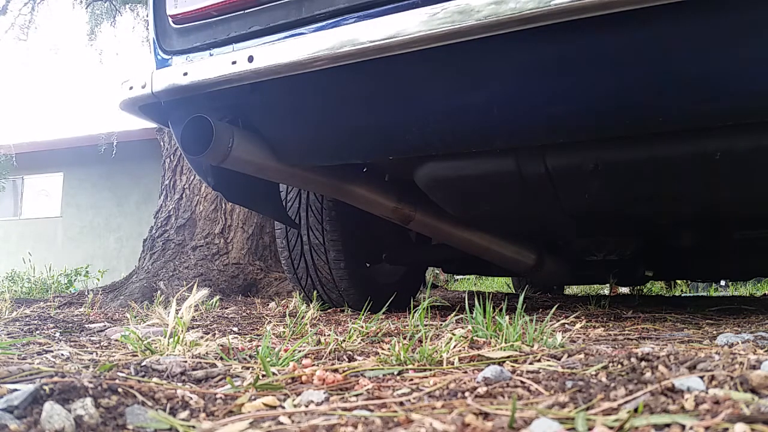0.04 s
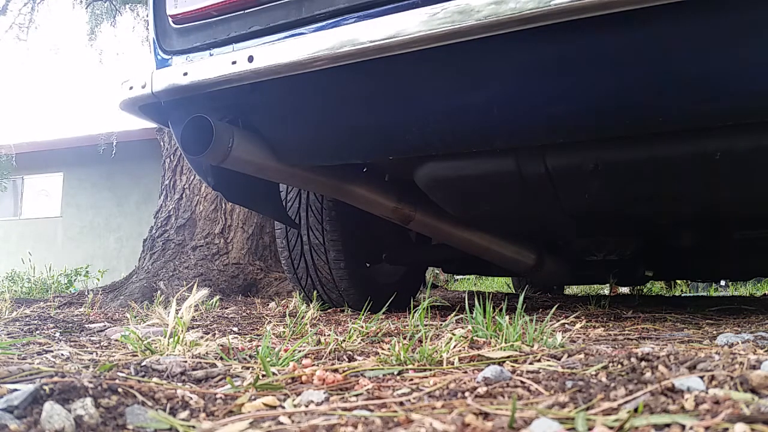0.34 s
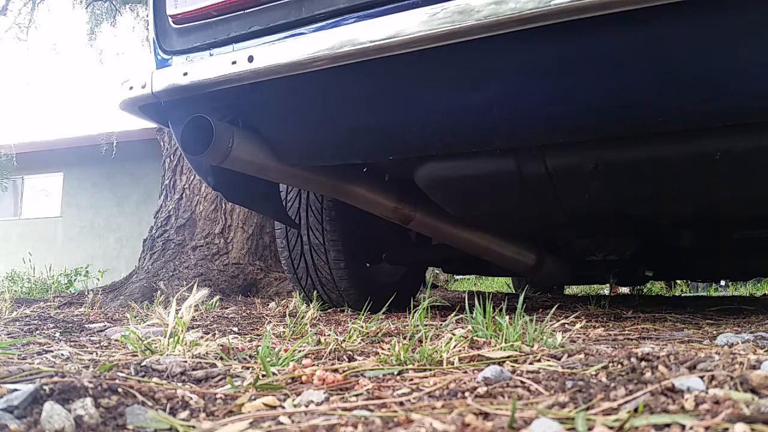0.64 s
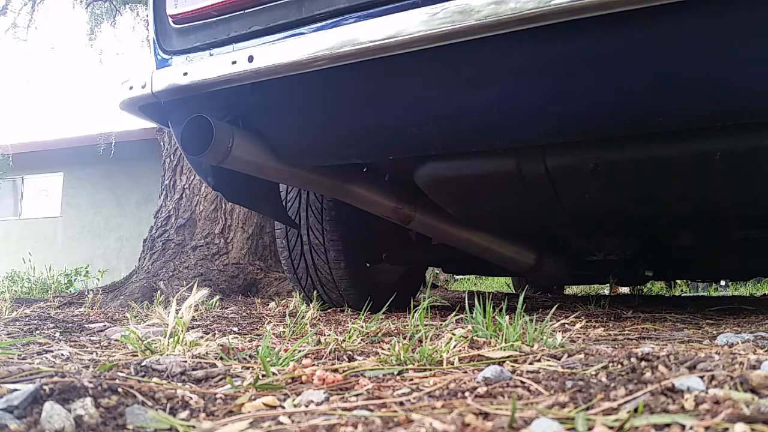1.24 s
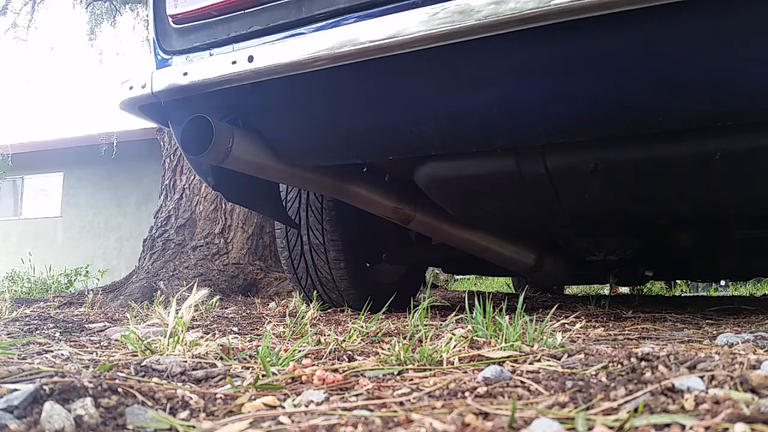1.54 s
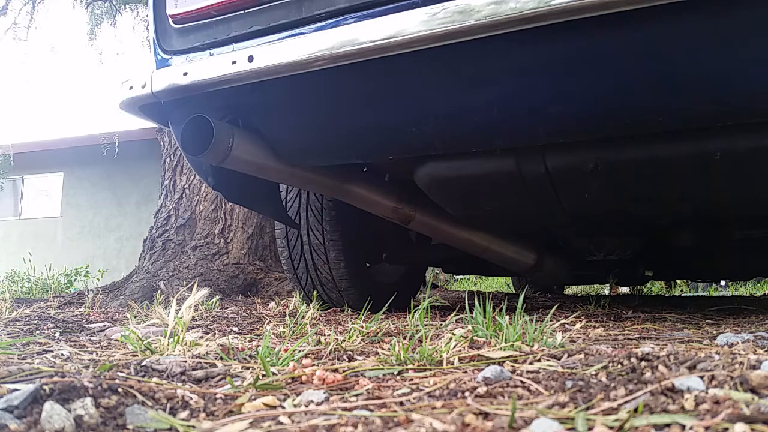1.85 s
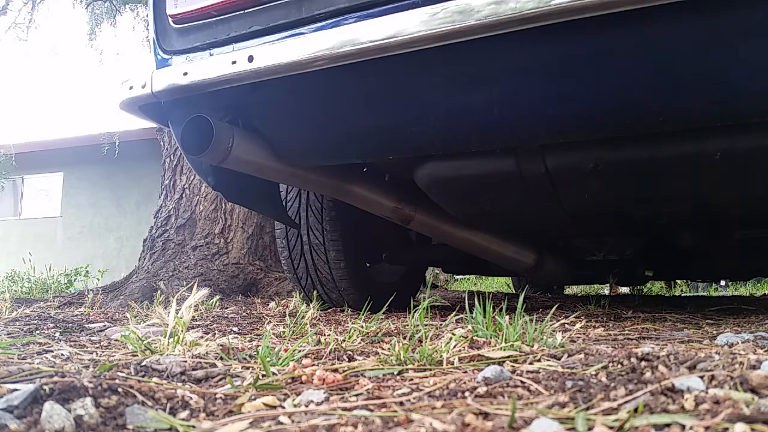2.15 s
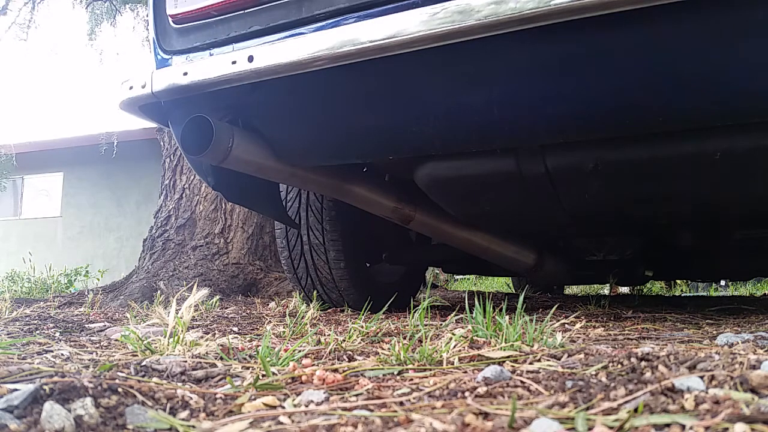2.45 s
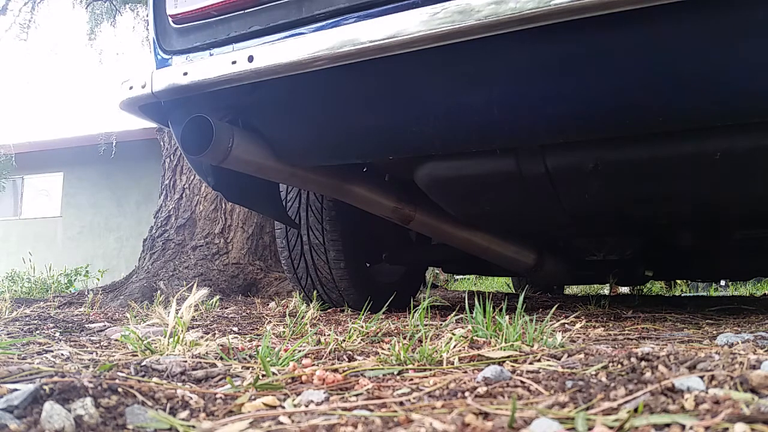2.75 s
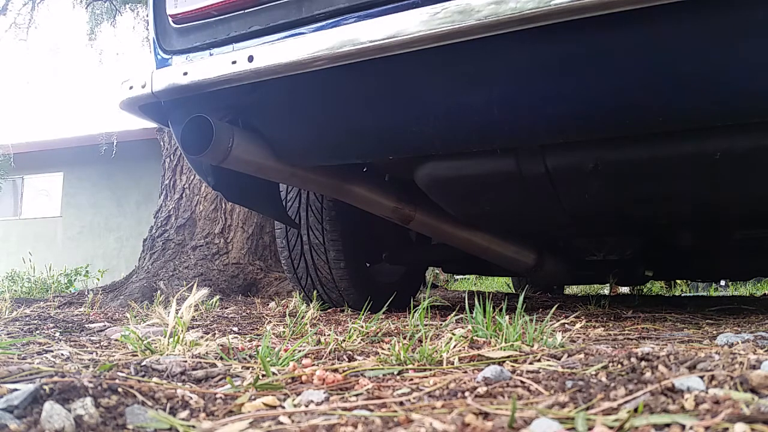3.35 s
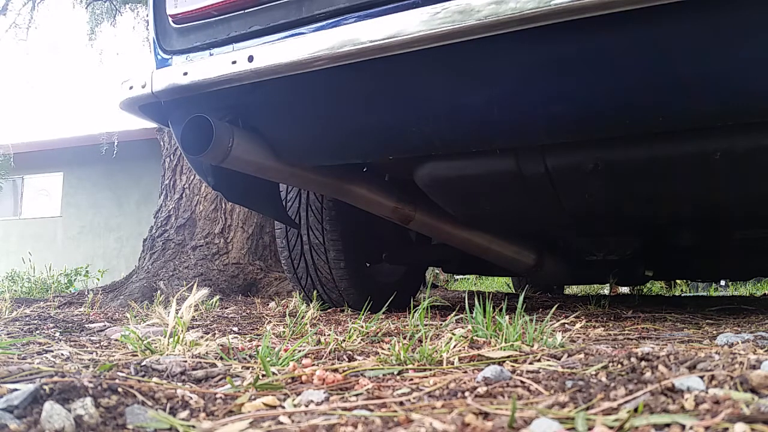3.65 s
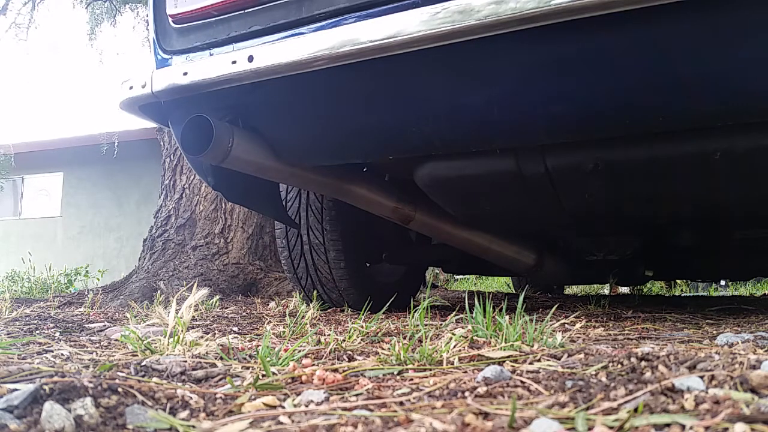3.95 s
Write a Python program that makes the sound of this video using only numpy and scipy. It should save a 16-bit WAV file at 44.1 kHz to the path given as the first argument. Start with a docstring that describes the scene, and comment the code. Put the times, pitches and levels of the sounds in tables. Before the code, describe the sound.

A car's exhaust, heard up close from the ground outdoors, burbles softly as the idle slows to a deep lope under a faint whistle. Then the engine revs once, climbing quickly with a rasp and a few small cracks.

```python
"""Outdoors, on the ground by a tailpipe: a six-cylinder car settles from a fast idle, then is revved.
Each firing thumps the silencer and rings the pipe's modes; unequal cylinders give a lope, and
late-burning fuel the odd burble. Under throttle the gas rasps, hisses in puffs and cracks.
A breathy whistle sinks slowly and rises with the revs, valves tick, a small bird chirps far off."""
import sys
import numpy as np
from scipy import signal
from scipy.fft import rfft, irfft
from scipy.io import wavfile
from scipy.ndimage import uniform_filter1d, minimum_filter1d, map_coordinates

SR = 44100
rng = np.random.default_rng(int(sys.argv[2]) if len(sys.argv) > 2 else 0)


def inscribe(sig):
    """Save sig as 16-bit PCM at rate SR to the path in sys.argv[1].

    A 1-D sig is mono; a 2-D sig holds one channel per row.
    Samples are clipped to [-1, 1] before scaling.
    """
    pcm = np.round(np.clip(np.atleast_2d(sig).T, -1, 1) * 32767)
    wavfile.write(sys.argv[1], SR, pcm.astype(np.int16))


N = 176400
TIME_S = np.arange(N) / SR
LEAN_LEFT_DB = [[2.5], [-2.5]]


def from_db(db):
    """Decibels to gain."""
    return 10 ** (np.asarray(db) / 20)


def rms_one(x):
    """Scale to rms 1."""
    return x / np.sqrt(np.mean(x ** 2) + 1e-20)


def evened(x, span_s):
    """Hold the running rms at 1."""
    return x / np.sqrt(np.abs(uniform_filter1d(x * x, int(span_s * SR))) + 1e-20)


def in_time(rows):
    """Each column of a curve, at every sample."""
    s, *columns = np.transpose(rows)
    return [np.interp(TIME_S, s, c) for c in columns]


def butter(x, hz, kind, order=2):
    """Butterworth filter."""
    return signal.sosfilt(signal.butter(order, hz, kind, fs=SR, output="sos"), x)


def noise(spectrum):
    """Noise of a given spectrum, rolled off past its ends, rms 1."""
    hz, db = np.transpose(spectrum)
    log_hz = np.log(np.maximum(np.arange(N // 2 + 1) * SR / N, 1))
    beyond = np.maximum(np.log(hz[0]) - log_hz, 0) + np.maximum(log_hz - np.log(hz[-1]), 0)
    gain = from_db(np.interp(log_hz, np.log(hz), db) - 47 * beyond)
    return rms_one(irfft(rfft(rng.standard_normal(N)) * gain, N))


def direct(x, lag_s=0.00018):
    """Direct sound in stereo: later and louder on the right."""
    late = map_coordinates(x, [np.arange(N) - lag_s * SR], order=3, mode="nearest")
    return np.array([from_db(-1.89) * x, from_db(1.5) * late])


def wide_noise(spectrum, width=0.88):
    """Direct noise plus a share scattered by the ground and the car's underside."""
    straight = np.sqrt(1 - width ** 2) * direct(noise(spectrum))
    return straight + width * np.array([noise(spectrum), noise(spectrum)])


def clicks(s, db):
    """One click for each time."""
    return np.bincount(np.clip(s * SR, 0, N).astype(int), from_db(db), N + 1)[:N]


def bursts(s, db, rise_s):
    """Envelopes that swell to the given peaks and die away."""
    age = np.arange(SR // 5) / SR / rise_s
    return signal.fftconvolve(clicks(s, db), age * np.exp(1 - age))[:N]


def resonate(x, modes):
    """Parallel resonances of alternating sign."""
    out = 0
    for k, (hz, width_hz, db) in enumerate(modes):
        r = np.exp(-np.pi * width_hz / SR)
        ring = signal.lfilter([1, 0, -1], [1, -2 * r * np.cos(2 * np.pi * hz / SR), r * r], x + 1e-18)
        out = out + (-1) ** k * from_db(db) * (1 - r * r) / 2 * ring
    return out


# Each row: time in seconds, firings per second.
FIRING_RATE = [(0.0, 55.42), (0.25, 52.5), (0.5, 49.13), (0.75, 46.82), (0.95, 43.13), (1.2, 40.38),
               (1.35, 38.94), (1.55, 41.51), (1.9, 42.49), (2.13, 40.28), (2.45, 43.62), (2.75, 40.94),
               (3.06, 40.95), (3.27, 42.8), (3.4, 41.32), (3.45, 50.15), (3.6, 90.06), (3.7, 111.98),
               (3.82, 135.84), (3.92, 145.78), (4.0, 132.86)]


def crankshaft():
    """Firing rate in Hz and the running count of firings."""
    firing_hz = in_time(FIRING_RATE)[0]
    return firing_hz, np.cumsum(firing_hz) / SR


# Firing order. Each row: place in the period (0-1), then thump, low ring, high ring in relative dB.
CYLINDER_PULSES = [(.28, 0.5, -8.5, -9), (.282, -3, -3.5, -2.5), (.29, 2.15, -9, -1.5),
                   (.285, -3.5, -11, -9), (.27, -0.5, 1.5, -10), (.265, -2, -10.5, 5)]
# Each row: time in seconds, factor on the unevenness of timing and thump.
LOPE_DEPTH = [(0, 1.87), (1.1, 1.68), (1.5, 0.82), (3.4, 0.72), (3.52, 0.42), (3.88, 0.58), (3.95, 1.2)]
# Each row: mode frequency in Hz, width in Hz, relative gain in dB.
SILENCER_MODES = [(79.7, 20, -6), (136.07, 17.7, 5.5), (161.3, 26, -2)]
PIPE_LOW_MODES = [(253.9, 9.2, 4), (292.2, 28, -5.5)]
PIPE_HIGH_MODES = [(376.3, 12, 6), (415.5, 66, -6), (512, 30, -12), (566, 11, -12), (657.5, 17, -10),
                   (775, 13, -23.5), (990, 54, -25)]
# Each row: time in seconds, then thump, low ring, high ring in dB before trim.
EXHAUST_LEVELS = [(0, -12.5, -24.5, -31), (.3, -11.5, -20, -27), (.8, -12, -22, -30),
                  (1.25, -12, -22, -32.5), (1.55, -9.5, -19.5, -30.5), (1.9, -9.5, -22.5, -26),
                  (2.1, -11.5, -20, -26.5), (2.4, -9, -21.5, -23.5), (2.7, -11, -20, -28),
                  (3.28, -9.5, -21, -26), (3.39, -13, -23, -38), (3.44, -10.5, -24, -25.5),
                  (3.55, -10.5, -20, -26), (3.75, -4.5, -26, -26), (3.92, -11.5, -17, -25.5),
                  (4, -7.5, -28, -28)]


def exhaust(crank, jitter_s=0.000093, thump_scatter_db=2.8, ring_scatter_db=4, low_lag_s=0.0023):
    """Each cylinder's pulse thumps the silencer and rings the pipe."""
    firing = np.arange(int(crank[-1]))
    place, thump_db, low_db, high_db = np.array(CYLINDER_PULSES)[firing % len(CYLINDER_PULSES)].T
    chance = rng.standard_normal((len(firing), 4)).T
    lope = np.interp(firing, crank, in_time(LOPE_DEPTH)[0])
    fires_at = firing + place.mean() + lope * (place - place.mean())
    s = np.interp(fires_at, crank, TIME_S) + jitter_s * lope * chance[0]
    thump = resonate(clicks(s, lope * (thump_db + thump_scatter_db * chance[1])), SILENCER_MODES)
    low = resonate(clicks(s + low_lag_s, low_db + ring_scatter_db * chance[2]), PIPE_LOW_MODES)
    high = resonate(clicks(s, high_db + ring_scatter_db * chance[3]), PIPE_HIGH_MODES)
    thump = evened(butter(thump, 194, "low", order=4), span_s=0.037)
    low = evened(butter(low, [170, 430], "band", order=3), span_s=0.17)
    high = evened(butter(high, [290, 884], "band", order=3), span_s=0.22)
    trim_db = np.array([[-0.5], [1], [-0.5]])
    thump_gain, low_gain, high_gain = from_db(in_time(EXHAUST_LEVELS) + trim_db)
    return direct(thump_gain * thump + low_gain * low + high_gain * high)


# Each row: time in seconds, level in dB before pulsing.
RASP_LEVEL = [(0, -40), (.7, -40.5), (.85, -42.5), (1.3, -41), (3.405, -40), (3.412, -27), (3.52, -22.5),
              (3.8, -22.5), (3.94, -29.5), (4, -37.5)]
HISS_LEVEL = [(3.39, -81.5), (3.412, -59.5), (3.47, -47), (3.63, -44.5), (3.7, -46.5), (3.85, -47),
              (3.91, -61.5), (4, -71.5)]
# Each row: frequency in Hz, relative level in dB.
RASP_SPECTRUM = [(150, -13.5), (400, -6), (560, 12), (740, 3), (860, -12), (1020, -4.5), (1270, -13.5),
                 (1420, -11), (1650, -11.5), (2000, -19.5), (2500, -35.5), (3500, -49.5), (6000, -62)]
HISS_SPECTRUM = [(1800, -33.5), (3000, -20.5), (4200, -19.5), (5200, -6.5), (6800, -5), (8500, -4),
                 (10000, 6), (12500, 1), (14300, -2), (15700, -12.5)]


def gas_puffs(crank, firing_hz, scatter_db=2.5, merge_hz=170):
    """Turbulent gas rasps and hisses, one puff per firing; steady flow takes over near merge_hz."""
    place, rise, decay = 0.33, 0.069, 0.11  # firing periods
    firing, age = np.divmod(crank + 1 - place, 1)
    strength = from_db(scatter_db * rng.standard_normal(N // 100))[firing.astype(int)]
    puffs = strength * np.exp(-age / decay) * (1 - np.exp(-age / rise)) ** 2
    flow = evened((firing_hz / merge_hz) ** 3 + puffs, span_s=0.15)
    throb = 1 + 0.36 * np.cos(2 * np.pi * (age - decay))
    rasp = from_db(in_time(RASP_LEVEL)[0]) * throb * wide_noise(RASP_SPECTRUM, width=0.4)
    hiss = from_db(in_time(HISS_LEVEL)[0]) * flow * wide_noise(HISS_SPECTRUM)
    return rasp + hiss * from_db(LEAN_LEFT_DB)


# Each row: start in seconds, peak in dB.
BURBLE_EVENTS = [(0.004, -21.5), (0.101, -24.5), (0.215, -22), (0.264, -19), (0.329, -23), (0.629, -18.5),
                 (0.689, -24.5), (1.049, -28), (1.247, -27.5), (3.634, -27), (3.934, -17.5)]
# Each row: frequency in Hz, relative level in dB.
BURBLE_SPECTRUM = [(200, -46), (350, 0), (470, 8.5), (680, -6), (900, -21.5), (1600, -37.5), (3000, -55.5)]


def burbles():
    """Late-burning fuel pops softly."""
    s, db = np.transpose(BURBLE_EVENTS)
    return direct(bursts(s, db, rise_s=0.008) * noise(BURBLE_SPECTRUM))


# Each row: start in seconds, peak in dB before trim.
CRACK_EVENTS = [(3.6914, -45.5), (3.737, -44), (3.7483, -40.5), (3.7906, -34.5), (3.8156, -51),
                (3.8352, -35.5)]
# Each row: frequency in Hz, relative level in dB.
CRACK_SPECTRUM = [(1200, -15.5), (2000, 3.5), (3200, -7), (5000, -14), (9000, -21.5)]


def cracks(trim_db=3.5):
    """Sharp cracks in the pipe at high revs."""
    s, db = np.transpose(CRACK_EVENTS)
    return bursts(s, db + trim_db, rise_s=0.00045) * wide_noise(CRACK_SPECTRUM)


# Each row: time in seconds, pitch in Hz, level in dB.
WHISTLE_GLIDE = [(0, 2321, -78), (.6, 2150, -62), (1, 1932, -57), (1.4, 1794, -50), (2.15, 1655, -48.5),
                 (2.7, 1481, -49), (3.2, 1379, -49), (3.4, 1400, -46.5), (3.55, 1648, -46.5),
                 (4, 1772, -74)]


def whistle(half_width_hz=75):
    """A gliding band of breathy noise, probably from the idle air passage."""
    hz, db = in_time(WHISTLE_GLIDE)
    a, b = butter(rng.standard_normal((2, N)), half_width_hz, "low")
    phase = 2 * np.pi * np.cumsum(hz) / SR
    return direct(from_db(db) * rms_one(a * np.cos(phase) + b * np.sin(phase)))


# Each row: frequency in Hz, relative level in dB.
TICK_SPECTRUM = [(2000, -15), (5000, -19.5), (8000, -22.5), (10000, -4), (12000, -7.5), (14000, -10)]


def valves(crank, level_db=-76, scatter_db=6):
    """Valves tick once every two firings."""
    s = np.interp(np.arange(1.45, crank[-1], 2), crank, TIME_S)
    db = level_db + scatter_db * rng.standard_normal(len(s))
    return bursts(s, db, rise_s=0.0015) * wide_noise(TICK_SPECTRUM) * from_db(LEAN_LEFT_DB)


# Each row: time in seconds, level in dB.
AIR_LEVEL = [(2.08, -93.5), (2.175, -65), (2.25, -86), (2.4, -100), (3.19, -98.5), (3.275, -55),
             (3.33, -57), (3.37, -63.5), (3.5, -92.5)]
# Each row: frequency in Hz, relative level in dB.
AIR_SPECTRUM = [(1800, -19.5), (2600, 5), (4200, -6.5), (6500, -12), (8700, -19), (10200, 6.5),
                (12500, 1.5), (15500, -2)]


def air_hiss():
    """Air hisses smoothly, probably at the throttle."""
    return from_db(in_time(AIR_LEVEL)[0]) * wide_noise(AIR_SPECTRUM) * from_db(LEAN_LEFT_DB)


# Each row: start in seconds, length in seconds, first and last pitch in Hz.
BIRD_CHIRPS = [(0.893, .1, 3460, 3300), (1.06, .04, 3400, 2900), (1.227, .05, 3440, 2810),
               (1.397, .04, 3400, 2700), (1.88, .06, 3620, 3800), (2.23, .04, 3700, 4200),
               (2.382, .05, 3720, 2900), (2.78, .04, 3550, 2730), (2.923, .05, 3700, 3800),
               (3.06, .04, 3700, 4200), (3.14, .05, 4000, 2800)]


def bird(left_db=-69.5, right_db=-73):
    """Short gliding chirps from the left."""
    out = np.zeros(N)
    for s, length_s, start_hz, end_hz in BIRD_CHIRPS:
        i, n = int(s * SR), int(length_s * SR)
        phase = 2 * np.pi * np.cumsum(np.linspace(start_hz, end_hz, n)) / SR
        out[i:i + n] += np.hanning(n) * np.sin(phase)
    return out * from_db([[left_db], [right_db]])


# Each row: frequency in Hz, relative level in dB.
RUMBLE_SPECTRUM = [(20, -5.5), (45, -13.5), (65, -1), (100, -2), (220, -2), (400, -11.5), (900, -38.5)]
OUTDOOR_SPECTRUM = [(500, -1.5), (2000, -1.5), (3200, -8), (5000, -25.5), (7500, -25.5), (11000, -24.5),
                    (15000, -31)]


def background(rumble_db=-21.5, outdoor_db=-71.5):
    """The flow's steady rumble and the outdoor air."""
    rumble = from_db(rumble_db) * direct(noise(RUMBLE_SPECTRUM))
    return rumble + from_db(outdoor_db) * wide_noise(OUTDOOR_SPECTRUM, width=0.8)


def scene():
    """Tailpipe, engine bay and bird over the background."""
    firing_hz, crank = crankshaft()
    bed = background()
    tailpipe = exhaust(crank) + gas_puffs(crank, firing_hz) + burbles() + cracks()
    engine_bay = whistle() + valves(crank) + air_hiss()
    return tailpipe + engine_bay + bird() + bed


def record(dry, ceiling=0.97, fade_in_s=0.004, stopband_hz=16695):
    """A limiter ducks the highest peaks; the top is cut."""
    span = int(0.011 * SR)
    gain = np.minimum(1, ceiling / (np.abs(dry).max(axis=0) + 1e-9))
    held = minimum_filter1d(gain, 2 * span)
    smooth = uniform_filter1d(uniform_filter1d(held, span), span)
    fade_in = np.minimum(1, TIME_S / fade_in_s)
    return signal.sosfilt(signal.cheby2(12, 70, stopband_hz, fs=SR, output="sos"), dry * smooth * fade_in)


dry = scene()
out = record(dry)
inscribe(out)
```